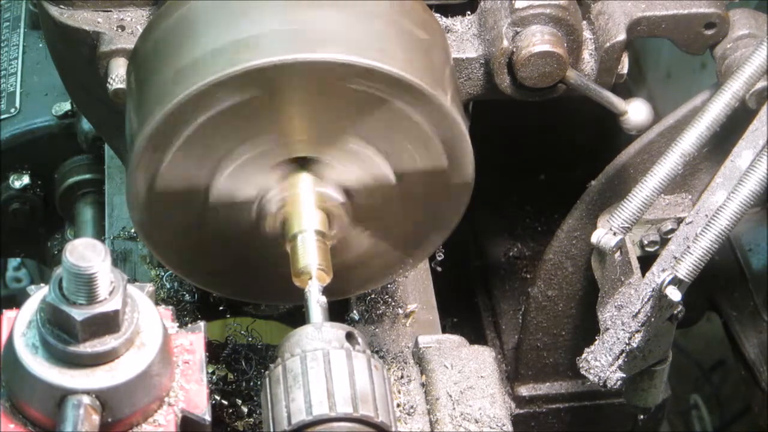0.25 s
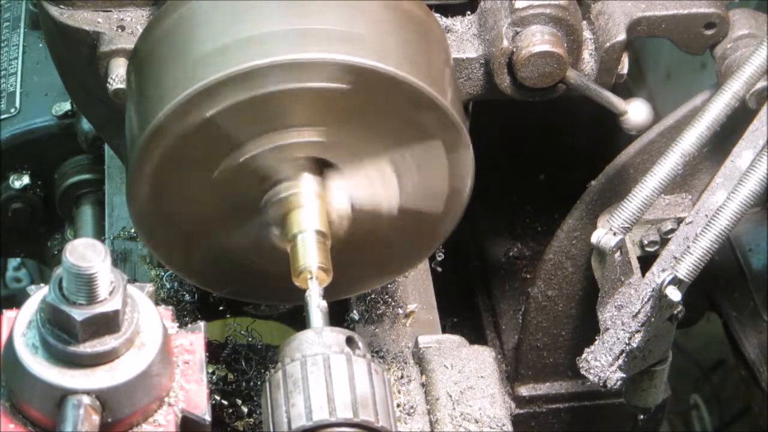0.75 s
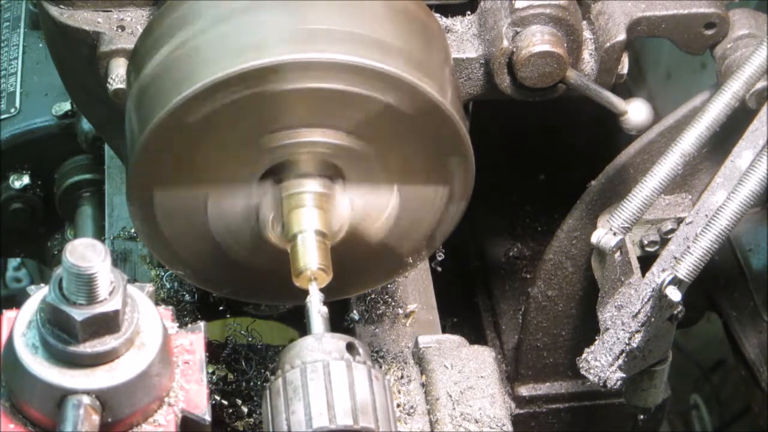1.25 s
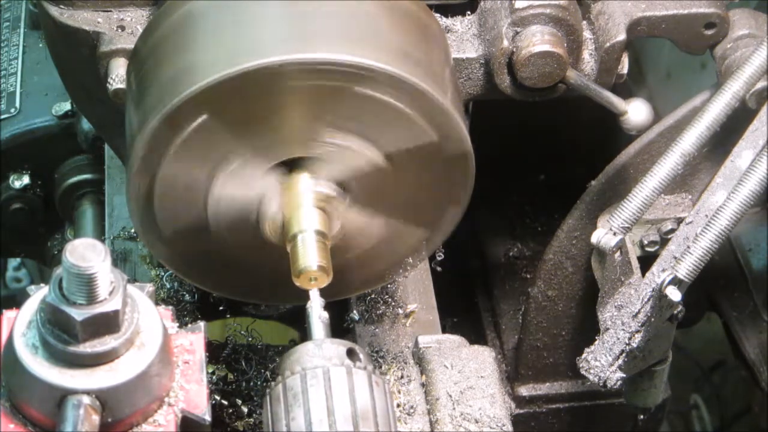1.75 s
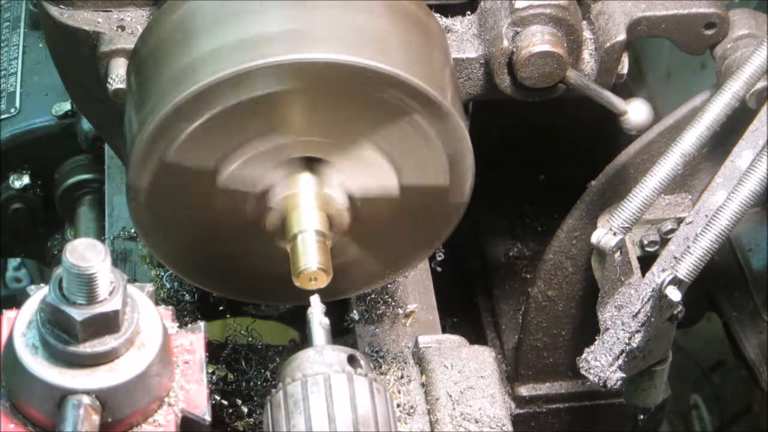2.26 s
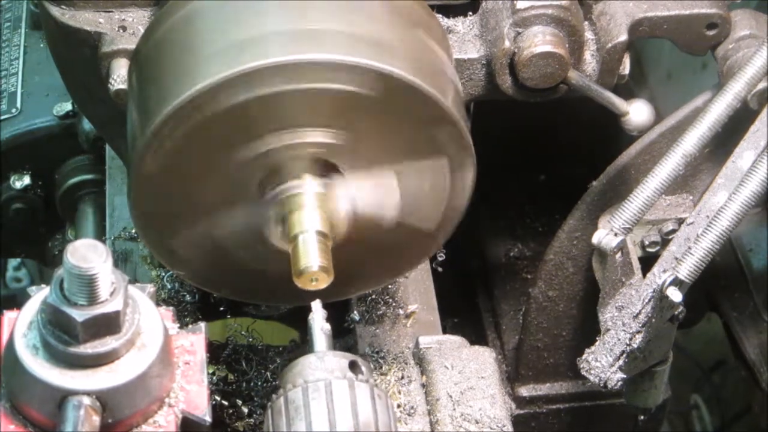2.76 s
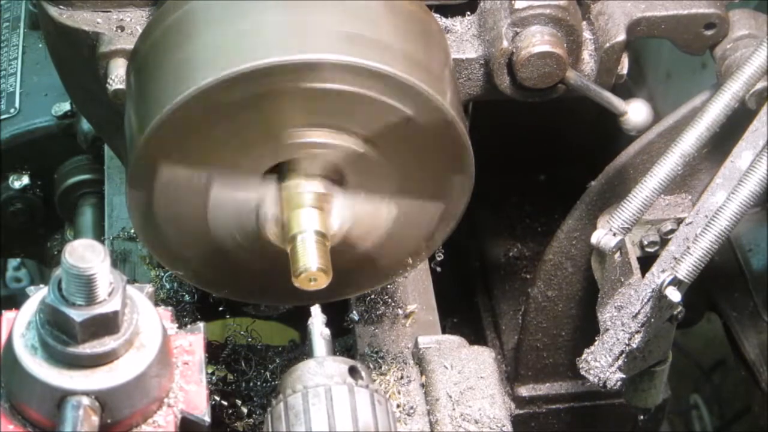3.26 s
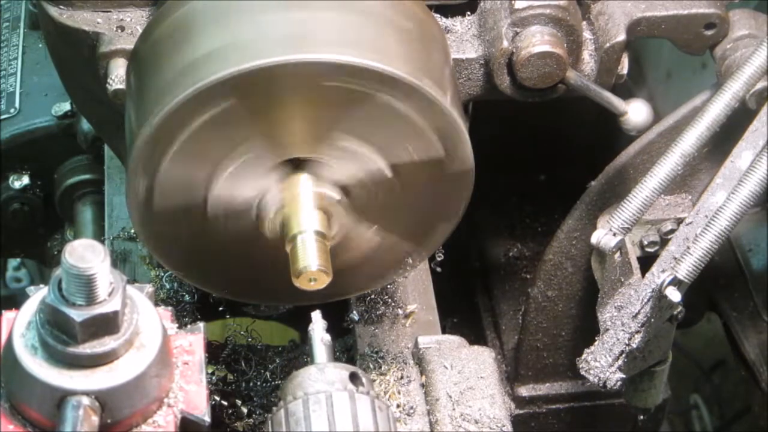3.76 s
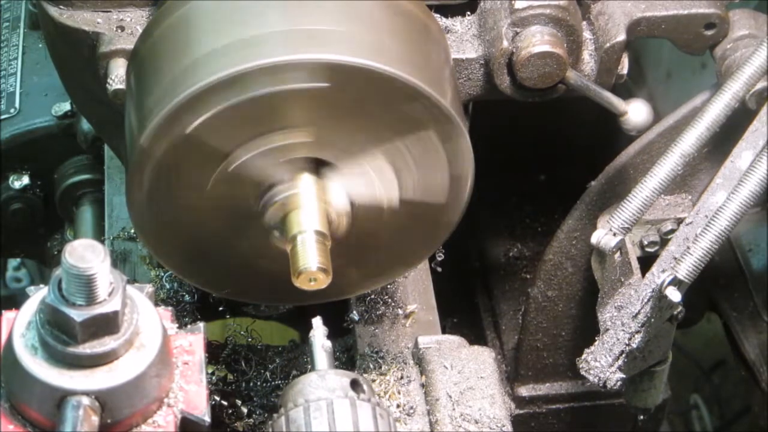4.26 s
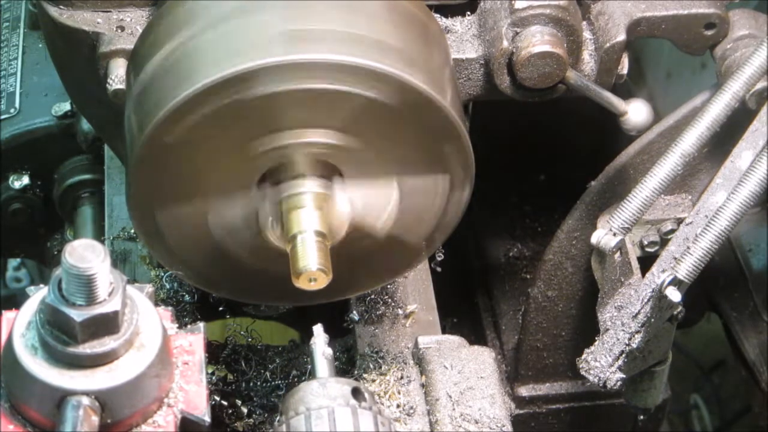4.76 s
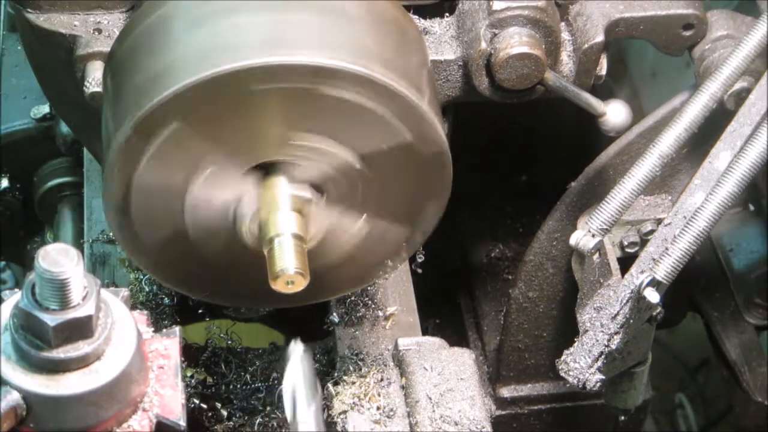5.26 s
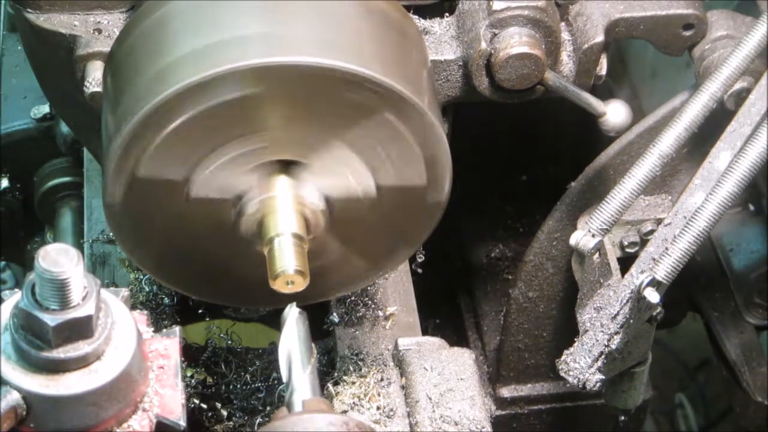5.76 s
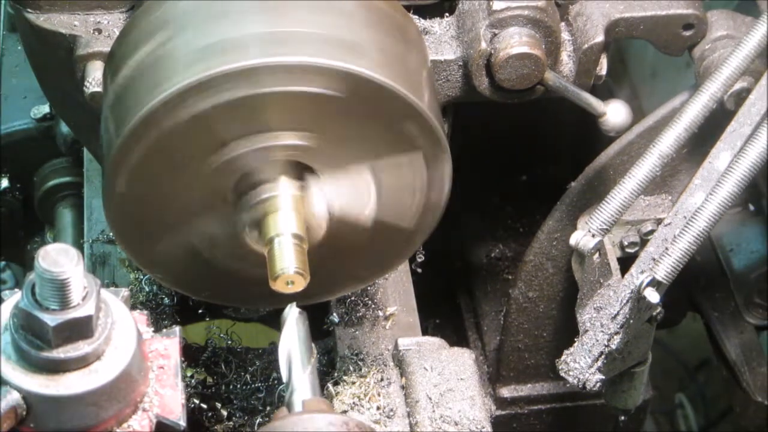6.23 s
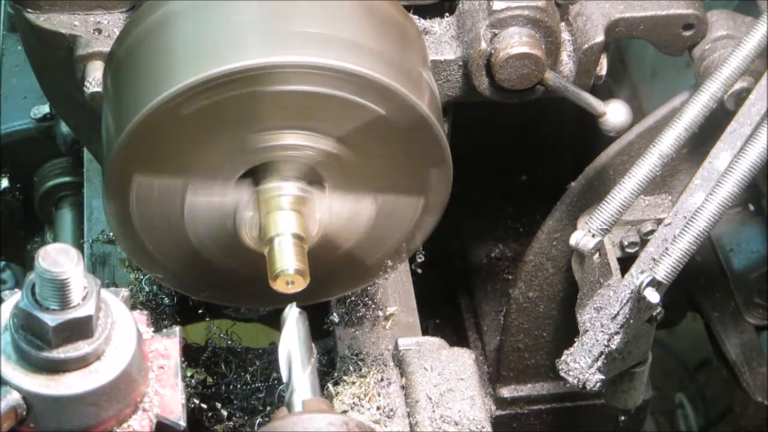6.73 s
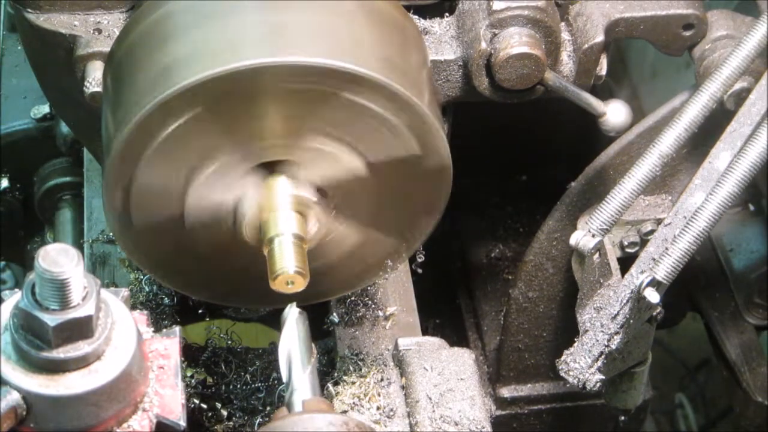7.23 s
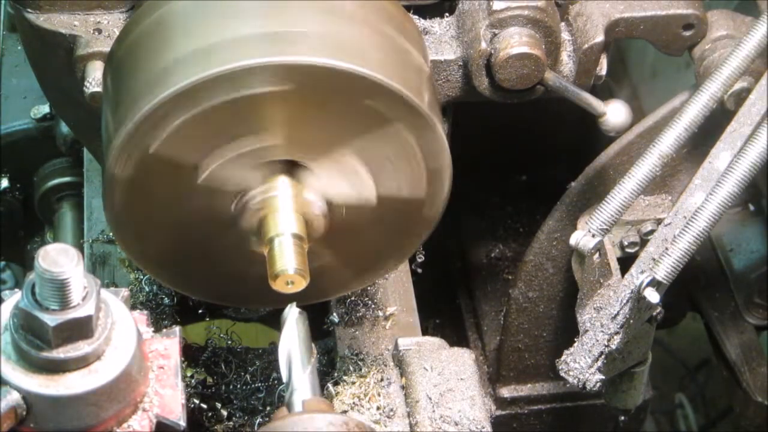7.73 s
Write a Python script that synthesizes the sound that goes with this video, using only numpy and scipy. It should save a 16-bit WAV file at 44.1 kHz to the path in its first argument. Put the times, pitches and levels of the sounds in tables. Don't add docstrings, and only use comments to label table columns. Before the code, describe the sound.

A camera microphone near a running lathe picks up rumbling gears, hissing belt friction and a thin electric whine. A hard, dry click repeats at regular intervals while the machine slowly fades away; around two and a half seconds, dull handling thumps briefly intrude. After a moment of silence the same machine returns gradually, steady and click-free, closing with two muted low knocks.

```python
import sys
import numpy as np
from scipy import signal
from scipy.fft import rfft, irfft, next_fast_len
from scipy.io import wavfile
from scipy.ndimage import uniform_filter1d, map_coordinates

SR = 44100
rng = np.random.default_rng(int(sys.argv[2]) if len(sys.argv) > 2 else 0)


def gain_from_db(level_db):
    decades = np.asarray(level_db, float) / 20
    return 10 ** decades


def unload_audio(sound):
    columns = np.transpose(np.atleast_2d(sound))
    steps = np.round(np.clip(columns, -1, 1) * 32767)
    wavfile.write(sys.argv[1], SR, steps.astype(np.int16))


N = 352359
TIME = np.arange(N) / SR
IN_S = 5.2035


def unit(x):
    return x / np.sqrt(np.mean(x ** 2) + 1e-20)


def along(points, hz):
    f, v = np.transpose(points)
    return np.interp(np.log(hz + 1), np.log(f + 1), v)


def wobble(rate):
    return map_coordinates(rng.standard_normal(int(N * rate / SR) + 4), [TIME * rate], order=1)


def filtered(x, response):
    m = next_fast_len(len(x) + SR // 4)
    return irfft(rfft(x, m) * response(np.fft.rfftfreq(m, 1 / SR)), m)[:len(x)]


def resonance(f, hz, width):
    return 1j * f * width / (hz * hz - f * f + 1j * f * width)


def notched(x, hz, width):
    return filtered(x, lambda f: 1 - 0.72 * resonance(f, hz, width))


def ringing(x, modes):
    def response(f):
        return sum(gain_from_db(db) * np.sqrt(SR / width / 2.54) * resonance(f, hz, width) ** 2
                   for hz, width, db in modes)
    return filtered(unit(x), response)


def rush(spectrum, t, patchy_db):
    z = signal.stft(rng.standard_normal(len(t) + 512), nperseg=512)[2]
    field = uniform_filter1d(rng.standard_normal(z.shape), 5, axis=0)
    field = uniform_filter1d(field, 8, axis=1)
    noise = signal.istft(z * gain_from_db(patchy_db * unit(field)), nperseg=512)[1][:len(t)]
    return unit(filtered(noise, lambda hz: gain_from_db(along(spectrum, hz))))


def turn(t, rate, phase):
    return np.cos(2 * np.pi * rate * t + phase)


def running(t):
    # t/s, gain/dB, gear load/dB
    drift = [(0, -0.5, -2), (.5, -0.34, 2.5), (1.6, -0.6, 2.5), (2, -.5, 2), (2.3, -1.5, 2),
             (2.55, -2.5, 2.5), (2.7, -3.5, 1), (3.1, -3, 1.5), (3.7, -0.5, 0.5), (4.3, -.5, 1.5),
             (5.1, -0.2, 1.5), (5.2, 3, -1.5), (5.6, -0.5, -0.5), (6, 0.5, 0), (6.8, 0, 2), (7.6, -.5, .5),
             (7.99, 1, -3.5)]
    s, *columns = np.transpose(drift)
    return [np.interp(t, s, column) for column in columns]


def knocks(t, load_db):
    mesh_hz = 82.06
    contacts = rng.random(len(t)) < 1300 / SR
    size = gain_from_db(load_db) * rng.uniform(-1, 1, len(t)) ** 3
    return contacts * size * (1 + 0.6 * turn(t, mesh_hz, -1.75))


def lathe(shot, t):
    # f/Hz, level/dB per Hz
    rumble = [
        [(8.8, -52.5), (15, -18.5), (38, -11.5), (64, -4), (92, -10.5), (113, -0.5), (147, -1.5), (232, 1),
         (303, 4), (396, -5.5), (574, -1), (789, -11.5), (830, -18.5), (1080, -34.5), (1830, -120)],
        [(10, -40), (20, -27), (40, -15), (65, -10), (90, -9), (118, -5), (150, -5.5), (232, -4.5), (330, -2.5),
         (403, -10), (603, -4), (776, -14.5), (830, -24), (1100, -53)],
    ]
    body = [
        [(460, -49.5), (780, -15), (981, -0.5), (1080, -4.5), (1220, -3), (1640, -3), (1800, 3), (2060, -4),
         (2220, -5), (2600, -6), (3040, -5), (3340, -8), (3900, -10.5), (5070, -37.5), (8580, -120)],
        [(460, -29), (780, -20), (863, -3), (1020, -2), (1100, -3), (1210, -2), (1510, 0), (1990, -1),
         (2430, -5), (2800, -5.5), (3060, 2.5), (3340, -9.5), (3900, -10), (5070, -26), (8580, -120)],
    ]
    hiss = [
        [(2400, -31), (3600, -7.5), (4450, 2), (5240, 0.5), (6200, 1.5), (7300, -6), (8500, -15), (9800, -17.5),
         (10500, -14), (11200, -21), (12500, -36.5), (14000, -60)],
        [(2400, -28), (3600, -6), (4300, -2.5), (5540, 1.5), (6200, -0.5), (7300, -7.5), (8500, -15),
         (9800, -20.5), (10500, -14), (11200, -24), (12500, -34), (14000, -60)],
    ]
    # rumble/dB, body/dB, hiss/dB
    levels = [
        (-36, -35, -39),
        (-37, -35, -39.5),
    ]
    # rumble/(dB/dB), body/(dB/dB), hiss/(dB/dB)
    load_shares = [
        (0.044, 0, -0.16),
        (-0.32, -.3, -0.084),
    ]
    # f/Hz, width/Hz, level/dB
    casting = [
        [(997, 50, -50.5), (1473, 99, -46), (1794, 160, -41.5), (2246, 40, -48.5), (2770, 23, -50.5),
         (3040, 170, -40.5), (5030, 53, -52), (5486, 90, -50.5), (6360, 130, -50)],
        [(614, 75, -44.5), (1430, 61, -48.5), (1740, 40, -56), (1948, 120, -48.5), (3058, 76, -45),
         (5330, 210, -51), (6020, 130, -53.5), (6420, 150, -58), (6980, 41, -54.5)],
    ]
    # f/Hz, width/Hz, level/dB
    cover = [
        (1204, 130, -44),
        (1260, 68, -47),
    ]
    # rate/(turns/s), depth/dB, phase/rad
    shafts = [
        [(5.147, 1.8, .8), (13.8, 1, -2.8), (17.57, 1.2, -2), (27.2, .3, -.3), (30.9, 1.6, .8),
         (41.15, 2.6, 1.1)],
        [(5.1, 2, -.3), (13.86, 2.2, -2.9), (27.41, 2.5, 1.3), (41.12, 2, -.8)],
    ]
    # rate/(turns/s), phase/rad
    lead_shaft = [
        (5.14, 0.23),
        (5.12, -2.5),
    ]
    belt_pulley = [
        (6.61, 1.45),
        (6.649, 0.23),
    ]

    rattle_db = running(t)[1]
    rumble_db, body_db, hiss_db = np.outer(load_shares[shot], rattle_db)
    low, mid, high = levels[shot]
    load_db = sum(depth * turn(t, rate, phase) for rate, depth, phase in shafts[shot])
    lead = turn(t, *lead_shaft[shot])
    pulley = turn(t, *belt_pulley[shot])
    rate, _, phase = shafts[shot][2]
    third_shaft = turn(t, rate, phase)

    sound = gain_from_db(low + rumble_db) * rush(rumble[shot], t, patchy_db=1.0)
    body_db = mid + body_db + 0.23 * load_db + 0.37 * pulley
    sound += gain_from_db(body_db) * rush(body[shot], t, patchy_db=1.14)
    hiss_db = high + hiss_db + 1.6 * pulley + 0.67 * third_shaft
    sound += gain_from_db(hiss_db) * rush(hiss[shot], t, patchy_db=1.8)
    rattle = sum(ringing(knocks(t, load_db), casting[shot][k::3]) for k in range(3))
    sound += gain_from_db(rattle_db) * rattle
    sound += ringing(knocks(t, 7 * lead), [cover[shot]])
    return notched(sound, hz=1092, width=18)


def motor():
    # f/Hz, first shot/dB, second shot/dB, unsteadiness/dB
    tones = [(72.8, -50.5, -52, 2.5), (81.1, -55, -73, 4.5), (101.4, -57, -63, 3.5),
             (120.9, -47, -42.5, 2.5), (148.4, -57.5, -59, 6), (184, -51.5, -59, 3),
             (221.5, -47, -47.5, 2.5), (240.5, -54, -49.5, 5.5), (247.6, -55, -61, 0.5),
             (294.4, -56, -63, 2), (300, -56, -55, 8), (330.5, -52.5, -54.5, 1), (490, -59.5, -60, -2),
             (499, -62, -61, 4), (577, -51, -56, 3), (650, -58.5, -57, 6)]
    # f/Hz, first shot/dB, second shot/dB, unsteadiness/dB
    whine = [(10121, -71, -71, 1), (10341, -65, -63, 1), (10395, -71, -67, 1.5), (10492, -60, -64.5, .8),
             (10570, -73, -73, 1.5), (10939, -76, -75, 1)]
    first = TIME < IN_S
    out = 0
    for hz, first_db, second_db, sway in tones + whine:
        level_db = np.where(first, first_db, second_db) + sway * wobble(6)
        phase = 2 * np.pi * hz * TIME + 0.11 * sway * wobble(3)
        out = out + np.sqrt(2) * gain_from_db(level_db) * np.sin(phase)
    return out


def microphone_hiss():
    # f/Hz, level/dB per Hz
    air = [(9000, -40), (11500, -3), (12500, 0), (14000, -5), (15700, -9), (17000, -12)]
    level_db = -69 + 1.2 * wobble(13)
    return gain_from_db(level_db) * unit(filtered(rng.standard_normal(N), lambda hz: gain_from_db(along(air, hz))))


def ticks():
    # t/s, peak/dB, depth/dB, edge/dB
    blows = [(0.241, -13.5, 6, 4.5), (0.698, -9, 0.5, -7), (1.1519, -10, -1, -1.5), (1.6075, -11.5, 0, 0),
             (2.0635, -8, 0, 6), (2.5166, -7.5, 6, 2), (2.9727, -7.5, -2.5, -4.5), (3.4294, -9, -1, 4),
             (3.8866, -9.5, -10, -2), (4.3409, -7.5, -1, 1), (4.798, -14, 0, -3)]
    # t/s, peak/dB, depth/dB, edge/dB
    rebounds = [
        (.254, -31, 4, -8),
        (2.072, -30, -8.5, 1),
        (2.98, -15.5, -7, -9),
        (2.989, -18, 3, -14),
        (3, -24.5, 10, -8),
    ]
    bands_hz = [3000, 4600, 6200, 10500]
    # f/Hz, level/dB, t60/s
    guard = [(1750, -18.5, .06), (2293, -4.5, 0.11), (2730, -9, 0.11), (3025, 8, 0.022),
             (3455, -0.5, 0.016), (4246, -2, 0.035), (4508, 1.5, 0.05), (4630, -5, 0.044),
             (4780, -5, 0.066), (4760, -9.5, 0.027), (5450, 0, 0.05), (5600, -7.5, 0.062),
             (5800, -11.5, 0.07), (6290, 3, 0.031), (6370, -5, 0.047), (6830, -13.5, .045),
             (7340, -1.5, .04), (8940, 1, 0.05), (9700, -5, .04), (11150, -5.5, .02), (11500, -10, .09),
             (12540, 4, .028), (13550, -10, .08), (13350, -2, .05), (14700, -10.5, .05)]
    body_colour = [(500, -23.5), (1200, -3), (2200, 0)]  # f/Hz, level/dB

    out, t = np.zeros(N + SR), np.arange(SR // 5) / SR
    chance = rng.random((len(blows + rebounds), len(guard), 2))
    free_time = np.clip(t - .004, 0, None)
    puff_decay = .9 * gain_from_db(-60 * t / .012) + 0.45 * gain_from_db(-60 * free_time / 0.023) + 0.18 * gain_from_db(-60 * t / 0.22)
    onset = 1 - np.exp(-t / .00035)
    for (s, db, depth_db, edge_db), draws in zip(blows + rebounds, chance):
        colour = [-5 + 0.57 * depth_db, depth_db, 0, -21 + edge_db]
        tilt = list(zip(bands_hz, colour))
        ring = 0
        for (hz, level, t60), (u, v) in zip(guard, draws):
            mode_db = level + along(tilt, hz) + 6.8 * (u - .5) - 60 * free_time / t60
            ring = ring + gain_from_db(mode_db) * np.sin(2 * np.pi * (hz * t + v))
        steep = tilt + [(16000, colour[-1] - 15)]
        puff = filtered(rng.standard_normal(len(t)), lambda f: gain_from_db(along(steep, f) + along(body_colour, f)))
        blow = (ring / np.std(ring[:300]) + unit(puff) * puff_decay) * onset
        out[round((s - .0003) * SR):][:len(t)] += gain_from_db(db - 8) * blow
    return out[:N]


def thuds(rows):
    out = np.zeros(N)
    for s, db, hz, t60 in rows:
        t = np.clip(TIME - s, 0, None)
        onset = 1 - np.exp(-t / 0.0021)
        out -= gain_from_db(db - 60 * t / t60) * np.sin(2 * np.pi * hz * t) * onset
    return out


def stand():
    # t/s, strength/dB, hardness/(dB/octave)
    bumps = [
        (2.466, -28, 2),
        (2.482, -32, 4),
        (2.546, -36, -5),
        (2.651, -20.5, -1),
        (2.69, -34, -2),
        (2.724, -31, -3),
        (2.748, -34, -1),
        (2.835, -34, -4),
    ]
    # f/Hz, level/dB, t60/s
    stand_modes = [
        (45, -3.5, .14),
        (83, 0.5, .3),
        (109.7, -8, .14),
        (153, -5, 0.19),
    ]
    pivot_hz = stand_modes[1][0]
    return thuds([(s, db + level + hard_db * np.log2(hz / pivot_hz), hz, t60)
                  for s, db, hard_db in bumps for hz, level, t60 in stand_modes])


def fade():
    frame, out_s, fade_s = 1 / 29.97, 5.105, 5.1
    down = np.clip(np.ceil((out_s - TIME) / frame), 0, None)
    trail = np.clip((out_s + .016 - TIME) / .016, 0, 1) ** 3 * .5
    down = np.maximum(down, trail)
    up = np.where(TIME > IN_S, np.maximum(np.floor((TIME - IN_S) / frame), .1), 0)
    return uniform_filter1d((down + up) * frame / fade_s, size=64)


def feed_wheel():
    # t/s, level/dB, f/Hz, t60/s
    feed = [
        (7.83, -40.5, 405, 0.51),
        (7.9, -53, 300, .3),
        (7.92, -39, 490, .25),
    ]
    return thuds(feed)


def scene():
    cut = round(5.16 * SR)
    machine = np.concatenate([lathe(0, TIME[:cut]), lathe(1, TIME[cut:])]) + motor()
    machine += microphone_hiss()
    shots = gain_from_db(running(TIME)[0]) * machine + ticks() + stand()
    return (fade() * shots + feed_wheel())[None]


def starved(x):
    # t/s, loss/dB
    starved_frames = [(.13, 9), (.28, 9), (.34, 12), (.47, 10), (.535, 11), (.75, 12), (1.172, 15),
                      (1.67, 13), (2.225, 10), (2.35, 10), (2.988, 11), (3.055, 12), (3.33, 13), (3.39, 9),
                      (3.565, 13), (3.672, 12), (3.82, 11), (5.06, 12), (5.275, 11), (5.335, 12),
                      (5.51, 10), (5.55, 10), (6.155, 22), (7.13, 11), (7.255, 11)]
    hz, t, z = signal.stft(x, SR, nperseg=512, noverlap=448)
    hz, size = hz[:, None], uniform_filter1d(abs(z), size=9, axis=1)
    noisy = abs(hz - 10430) > 250
    weak = (size < .9 * uniform_filter1d(size, size=15, axis=0)) & (hz > 2000)
    weak = weak | (abs(hz - 3700) < 250)
    loss_db = 0
    for s, db in starved_frames:
        half_s = .024 * max(1, db / 14)
        depth = np.clip(1.8 - 4 * abs(t - s) / half_s, 0, 1)
        edge_hz = 7000 + 350 * max(0, 12 - db)
        below = np.where(weak, 1.3, -1.5 / db)
        loss_db = loss_db - db * noisy * depth * np.where(hz > edge_hz, 1.05, below)
    return signal.istft(z * gain_from_db(loss_db), SR, nperseg=512, noverlap=448)[1][:N]


def top_cut(x):
    return signal.sosfilt(signal.butter(12, 16480, fs=SR, output="sos"), x)


def record(dry):
    mix = starved(dry[0])
    mix = mix / (1 + abs(mix / .42) ** 4) ** .25
    top_hz = 15850
    band_limit = [(top_hz - 150, 0), (top_hz, -20), (16500, -35)]  # f/Hz, level/dB
    mix = filtered(mix, lambda f: gain_from_db(along(band_limit, f)))
    return top_cut(mix[None])


dry = scene()
out = record(dry)
unload_audio(out)
```